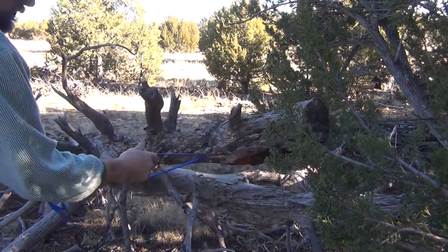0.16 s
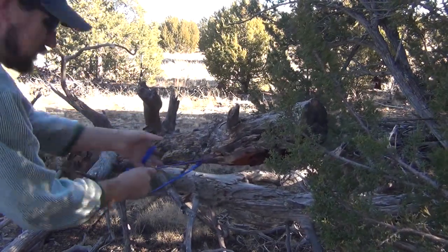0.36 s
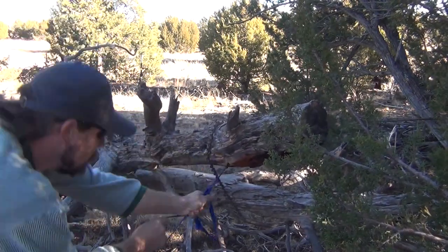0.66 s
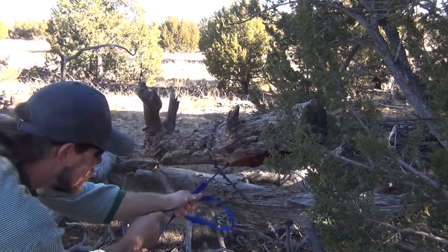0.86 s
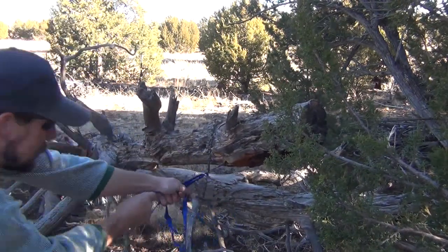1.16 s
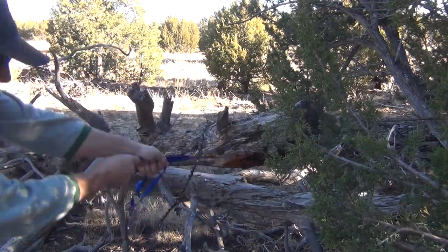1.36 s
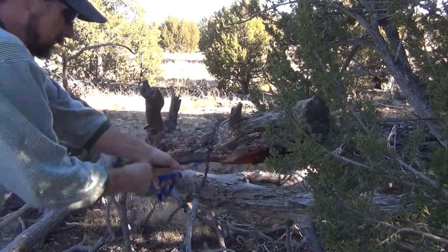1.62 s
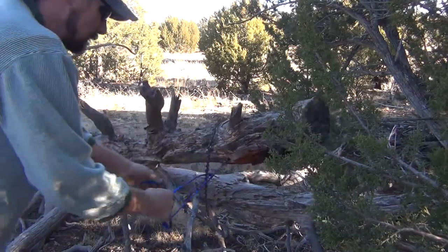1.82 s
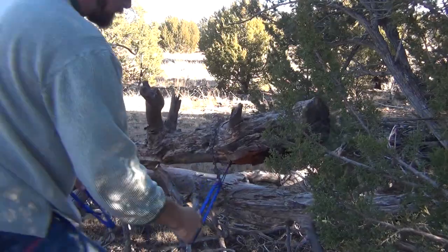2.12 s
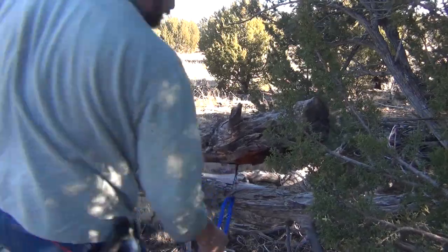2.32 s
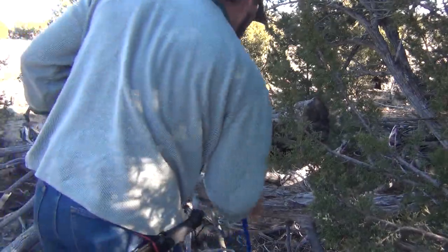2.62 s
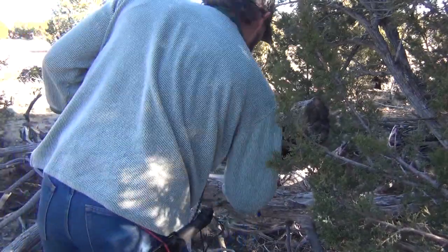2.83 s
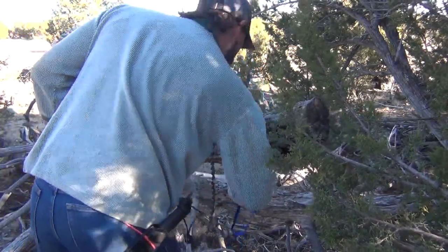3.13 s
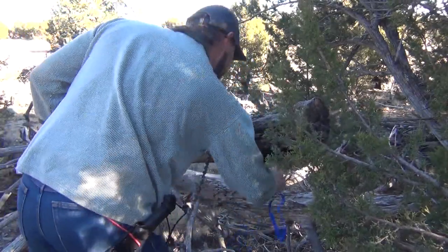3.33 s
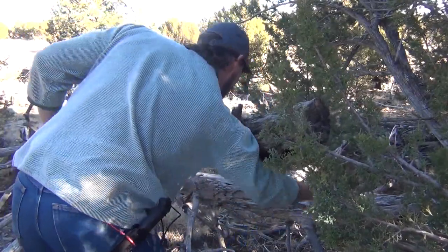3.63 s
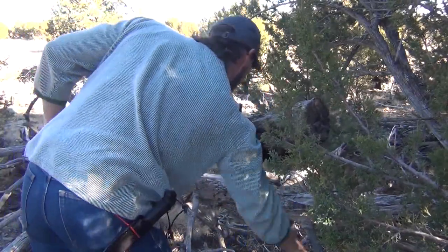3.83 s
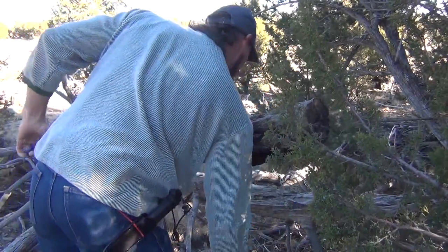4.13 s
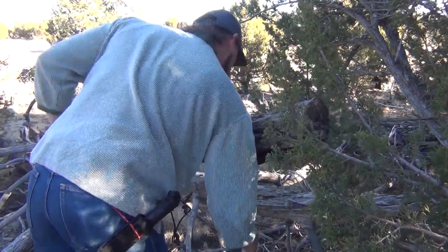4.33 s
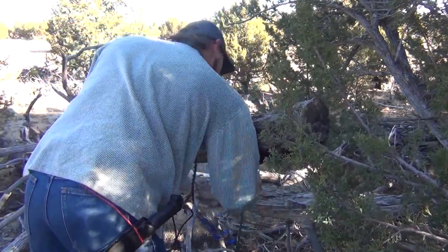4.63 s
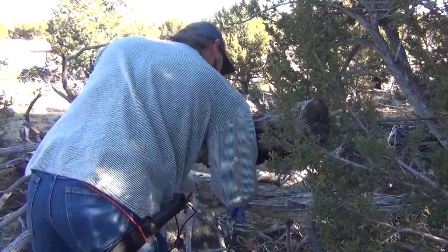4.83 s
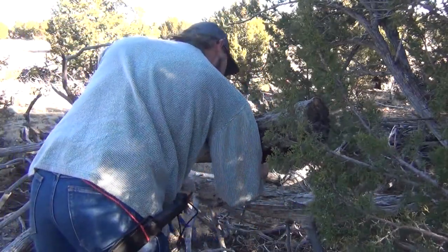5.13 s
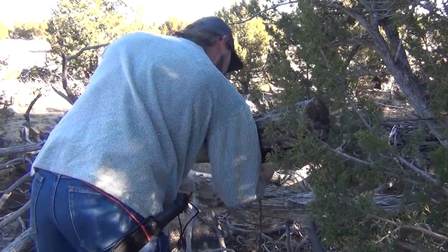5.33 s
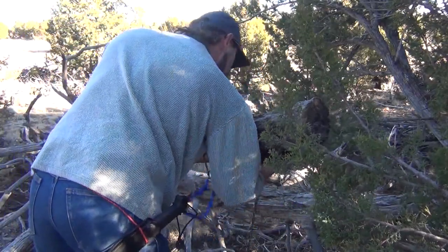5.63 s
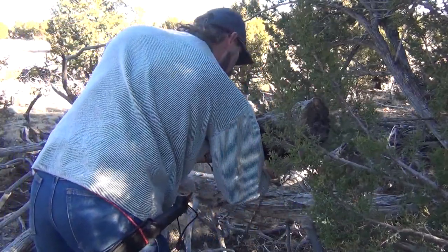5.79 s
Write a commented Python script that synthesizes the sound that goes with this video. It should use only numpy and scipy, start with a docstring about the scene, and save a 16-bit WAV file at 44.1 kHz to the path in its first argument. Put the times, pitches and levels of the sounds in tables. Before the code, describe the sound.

Outdoors, close and dry, a hand saw chain is dragged over a dead log. From 0 to 0.7 s coarse bright rasping dominates, full of sharp crackling snaps and dry woody knocks, strongest in the first 0.4 s. It eases, then two hard, resonant knocks land at about 1.3 and 1.4 s, followed by scraping and snaps until 1.75 s. Two tiny gliding metallic squeaks come near 1.9 s. Brittle crackling clusters at 2.3-2.5 s, then steel links clink and snap around 3.0-3.15 s. A woody scrape with a knock runs 3.5-3.7 s, and a hollow branch taps at 3.93 s. After 4.1 s it is sparse: a bright clink at 4.56, a snap at 4.76, very faint ticks near 5.0, 5.7 and 5.9 s. Low wind buffets flutter on the microphone, mostly before 2 s and at 3.7-4.4 s, over faint open-air hush and a thin, very high steady tone.

```python
"""Saw chain on a dry log

Outdoors among dead branches, a hand saw chain is dragged over a dry log and worked round it.
Teeth and links scrape the bark: tiny bursts of noise ring the wood and give a bright rasp. Twigs and bark snap
as short noise bursts; blows ring wood, a hollow branch and steel links; the links squeak as gliding whistles.
Gusts rumble on the microphone ports as low noise and swings, over a faint open-air hush and a thin high tone."""
import sys
import numpy as np
from scipy import signal
from scipy.fft import rfft, irfft, next_fast_len
from scipy.io import wavfile

SR = 44100
rng = np.random.default_rng(int(sys.argv[2]) if len(sys.argv) > 2 else 0)


def master(y):
    """Save y as 16-bit WAV."""
    cut = np.clip(np.atleast_2d(y).T, -1, 1)
    pcm = np.round(cut * 32767)  # scale
    wavfile.write(sys.argv[1], SR, pcm.astype(np.int16))


N = 262836
TIME = np.arange(N) / SR   # seconds
LEFT_RIGHT = np.array([[1], [-1]])   # opposite signs for the two channels

# what the dead wood rings with when undamped: [f/Hz, level/dB, time to fall 60 dB/s]
WOOD = [(163.4, 1, 0.15), (272.4, -1, 0.078), (421, -3, 0.069), (565, -1, 0.047), (777, -4, 0.056),
        (886, -8, 0.079), (1103, -2, 0.0064), (1466, 0.5, 0.051), (1910, -2, 0.01), (2210, 3.5, 0.011),
        (2486, -3.5, 0.025), (2850, 4, 0.0061), (3430, -5.5, 0.011), (4230, -24, 0.034), (5040, -29, 0.015)]


def from_db(db):
    """Turn decibels into gain."""
    return 10 ** (np.asarray(db) / 20)


def rms_one(x):
    """Scale to an rms (average strength) of 1."""
    return x / np.sqrt(np.mean(x ** 2) + 1e-20)


def in_time(rows):
    """Draw straight lines between table rows: one curve a column, one value a sample."""
    s, *columns = np.transpose(rows)
    return [np.interp(TIME, s, column) for column in columns]


def at_hz(points, hz):
    """Read a table over frequency, with straight lines on a log-frequency axis."""
    table_hz, values = np.array(points).T
    return np.interp(np.log(hz), np.log(table_hz), values)


def fft_grid():
    """Give a fast transform size and the frequency of each of its bins."""
    size = next_fast_len(N)
    return size, np.maximum(np.arange(size // 2 + 1) * SR / size, 1)


def colour(x, spectrum):
    """Filter a signal by a table of levels over frequency, then scale to rms 1."""
    size, hz = fft_grid()
    shaped = irfft(rfft(x, size) * from_db(at_hz(spectrum, hz)), size)
    return rms_one(shaped[..., :N])


def drift(rate_hz):
    """Wander slowly by chance: noise through two equal low-passes, rms 1."""
    r = np.exp(-2 * np.pi * rate_hz / SR)
    noise = rng.standard_normal(N + SR)
    slow = signal.lfilter([1], [1, -2 * r, r * r], noise)
    return rms_one(slow[SR:])   # the first second lets the filter settle


def resonance(x, hz, width_hz):
    """Ring at one frequency: a two-pole band-pass with gain about 1 at its top."""
    r = np.exp(-np.pi * width_hz / SR)
    top = (1 - r * r) / 2
    angle = 2 * np.pi * min(hz, 0.45 * SR) / SR
    return signal.lfilter([top, 0, -top], [1, -2 * r * np.cos(angle), r * r], x)


def highpass(x, hz):
    """Take away the lows with a gentle two-pole filter."""
    return signal.lfilter(*signal.butter(N=2, Wn=hz, btype="high", fs=SR), x)


def add(out, sound, s):
    """Mix a short sound in at time s."""
    i = round(s * SR)
    out[..., i:i + sound.shape[-1]] += sound[..., :N - i]


def at_random(per_s):
    """Pick chance moments, each with two normal draws."""
    draws = rng.standard_normal((600, 2))
    times = np.cumsum(rng.exponential(1, 600)) / per_s
    return [(s, *row) for s, row in zip(times, draws) if s < N / SR - 0.03]


def swell(t, contact_s):
    """Shape the force of a contact, which rises and then fades."""
    phase = t / max(0.5 * contact_s, 1e-4)
    return phase * np.exp(-phase)


def strike(push, modes, centre_hz, falloff_db):
    """Let a push ring every mode, less so far from the centre (dB per octave squared); peak 1."""
    ring = 0.45 * resonance(push, centre_hz, 1.73 * centre_hz)
    for k, (hz, level_db, t60) in enumerate(modes):
        width_hz = np.log(1000) / (np.pi * t60)   # a longer ring is narrower
        far_db = -falloff_db * np.log2(hz / centre_hz) ** 2
        gain = (-1) ** k * from_db(level_db + far_db) * np.sqrt(300 / width_hz)
        ring = ring + gain * resonance(push, hz, width_hz)
    return ring / np.abs(ring).max()


def hush():
    """Open air is steady noise, with a likeness of the two channels that changes with frequency."""
    # tone of the open air: [f/Hz, level per Hz/dB]
    air_tone = [(18, -44), (45, -7), (138, -12.5), (303, -1.5), (449, 0.5), (780, -2.5), (866, 2),
                (988, -3), (1190, -8), (16000, -13)]
    # likeness of left and right: [f/Hz, likeness from 0 to 1]
    likeness = [(60, 0.99), (240, 0.71), (950, 0.14), (3770, 0.22), (15000, 0.95)]
    hush_db = -60
    mid, side = rng.standard_normal((2, N))
    side_db = [(hz, 10 * np.log10(np.clip((1 - alike) / (1 + alike), 1e-3, 1))) for hz, alike in likeness]
    size, hz = fft_grid()
    side = irfft(rfft(side, size) * from_db(at_hz(side_db, hz)), size)[:N]
    return from_db(hush_db) * colour(mid + side * LEFT_RIGHT, air_tone)


def whine():
    """A thin, steady, very high tone is one sine, the same in both channels."""
    whine_hz, whine_db = 15735, -78   # rms level ahead of the microphone's roll-off
    return np.sqrt(2) * from_db(whine_db) * np.sin(2 * np.pi * whine_hz * TIME)


def wind():
    """Gusts on the ports are lumpy low noise, partly each port's own, with short swings on top."""
    # wind strength: [t/s, level/dB]
    wind_level = [(0.0, -55), (0.3, -50.5), (0.35, -62), (0.75, -56.5), (1.05, -55.5), (1.2, -65.5),
                  (1.4, -50), (1.7, -70.5), (2.1, -61.5), (2.9, -75), (3.45, -79), (3.7, -55.5),
                  (3.97, -52), (4.04, -73), (4.1, -52), (4.36, -58.5), (4.52, -78), (5.24, -74),
                  (5.63, -96), (5.96, -74)]
    # tone of the wind noise: [f/Hz, level per Hz/dB]
    gust_tone = [(25, -0.5), (70, 4), (130, -7.5), (220, -3), (400, -22)]
    # strong buffets, an eddy swinging the capsules a few times: [t/s, peak of the swing/dB, f/Hz]
    buffets = [(0.082, -34, 80.4), (0.127, -35.5, 98), (0.523, -34, 101), (0.751, -43, 99),
               (0.847, -42.5, 149), (0.999, -37, 104), (1.071, -34, 112), (1.098, -37.5, 127),
               (1.452, -38, 127), (1.845, -43.5, 111), (3.775, -39, 87.5), (3.822, -34, 150),
               (3.96, -42, 138), (4.085, -45, 110), (4.125, -38, 122), (4.275, -38.5, 120),
               (4.299, -31, 162)]
    # weaker eddies come at random, their typical level following the wind
    eddies_per_s, eddy_over_wind_db, eddy_hz = 30.0, 5, 102.5
    mid, side = rng.standard_normal((2, N))
    lumps = from_db(1.3 * drift(3.9))
    wind_db, = in_time(wind_level)
    out = from_db(wind_db) * colour(lumps * (mid + 0.12 * side * LEFT_RIGHT), gust_tone)

    eddies = []
    for s, p, q in at_random(eddies_per_s):
        db = wind_db[int(s * SR)] + eddy_over_wind_db + 5.0 * p
        eddies.append((s, db, eddy_hz * 1.25 ** q))
    swings = buffets + eddies
    angles = rng.uniform(-np.pi, np.pi, (len(swings), 2))
    for (s, db, hz), (start, skew) in zip(swings, angles):
        near = slice(max(round((s - 0.06) * SR), 0), min(round((s + 0.06) * SR), N))
        cycles = (TIME[near] - s) * hz
        slowing = 1 - 0.048 * cycles   # the pitch falls a little
        phase = 2 * np.pi * cycles * slowing + start + 0.2 * skew * LEFT_RIGHT
        out[:, near] += from_db(db) * np.exp(-(cycles / 0.74) ** 2) * np.sin(phase)
    return out


def squeaks():
    """Links squeak as short unsteady whistles gliding in pitch."""
    # squeaks: [t/s, length/s, start f/Hz, end f/Hz, typical peak level/dB]
    whistles = [(1.883, 0.025, 11800, 8800, -44), (1.945, 0.039, 12200, 14000, -44)]
    out = np.zeros(N)
    for s, length_s, from_hz, to_hz, db in whistles:
        t = np.arange(round(length_s * SR)) / SR
        hz = from_hz + (to_hz - from_hz) * t / length_s + 200 * drift(150)[:len(t)]
        gain = from_db(db + 2.5 * drift(120)[:len(t)]) * np.sin(np.pi * t / length_s)
        add(out, gain * np.sin(2 * np.pi * np.cumsum(hz) / SR), s)
    return out


def clinks():
    """Steel links clink together: a rough contact without lows rings the steel."""
    # clinks: [t/s, peak level/dB, centre of the ring f/Hz, contact length/s]
    touches = [(3.013, -24.5, 5000, 0.0053), (3.025, -17, 5000, 0.0024), (3.03, -19, 6500, 0.0011),
               (3.042, -26, 4500, .005), (3.063, -33, 5000, .002), (4.5627, -15, 11500, 0.0016),
               (5.911, -35, 8000, 0.0017), (5.929, -49, 10100, .002), (5.945, -47, 10500, .004)]
    # what the links ring with: [f/Hz, level/dB, time to fall 60 dB/s]
    steel = [(4340, -2, .02), (5150, -1.5, .02), (6100, -3, 0.017), (7200, -4, 0.013), (8140, -2, .015),
             (10300, 1, .02), (11700, 9, 0.021)]
    out, t = np.zeros(N), np.arange(6000) / SR
    for s, db, centre_hz, contact_s in touches:
        push = highpass(rng.standard_normal(len(t)) * swell(t, contact_s), 3500)
        add(out, from_db(db) * strike(push, steel, centre_hz, falloff_db=12.0), s)
    return out


def hollow_tap():
    """One tap on a hollow dry branch: a sharp pulse with some roughness rings the branch."""
    # the tap: [t/s, peak level/dB]
    tap = (3.9335, -11.5)
    # what the branch rings with: [f/Hz, level/dB, time to fall 60 dB/s]
    branch = [(608, -5.5, 0.032), (880, -2, 0.11), (1070, -1, 0.035), (1910, 5.5, 0.017), (2260, 10, 0.035),
              (2790, -13, 0.044), (3450, -5, 0.029), (4110, -13, .02)]
    out, t = np.zeros(N), np.arange(6000) / SR
    pulse = np.exp(-((t - 0.0015) / 0.00006) ** 2)
    rough = 0.15 * rng.standard_normal(len(t)) * swell(t, 0.0027)
    tap_s, tap_db = tap
    add(out, from_db(tap_db) * strike(pulse + rough, branch, 1130, falloff_db=1.5), tap_s)
    return out


def knocks():
    """Blows on dead wood: a rough contact, swelling then fading, rings the wood and shakes the log."""
    # blows: [t/s, peak level of the ring/dB, centre of the ring f/Hz, contact length/s]
    blows = [(0.057, -16.5, 2610, 0.0085), (0.282, -13, 3520, 0.0048), (0.357, -23, 1370, 0.00098),
             (0.6, -31, 1290, 0.0015), (0.609, -18.5, 3740, 0.0084), (1.186, -34, 590, 0.0047),
             (1.298, -7, 1660, 0.0065), (1.423, -7.5, 620, 0.0048), (1.501, -38, 565, 0.0073),
             (1.557, -20.5, 2030, 0.0034), (1.727, -30.5, 1780, 0.0034), (2.256, -41.5, 450, 0.0048),
             (2.477, -35.5, 636, 0.002), (2.515, -32, 570, 0.0022), (2.613, -37.5, 1950, 0.0021),
             (2.688, -47, 676, 0.0048), (2.926, -36, 1164, 0.0016), (2.963, -37.5, 2400, 0.0052),
             (3.013, -36, 394, 0.01), (3.049, -34.5, 400, 0.0034), (3.474, -23, 1600, 0.0065),
             (3.4905, -11, 2870, 0.0013), (3.698, -24, 1090, 0.005), (4.556, -30, 1746, 0.0028),
             (4.996, -47, 1170, 0.005), (5.01, -53, 1580, 0.008), (5.036, -49, 1600, 0.0036),
             (5.039, -44, 1130, 0.0025), (5.057, -46.5, 1240, 0.0055), (5.548, -41, 1090, 0.003),
             (5.5485, -39, 1640, 0.0035), (5.905, -41.5, 1800, 0.0034), (5.927, -47, 1700, 0.0043),
             (5.942, -47, 635, .01)]
    # weaker blows are soft touches on small pieces: dull, damped, ringing at their own pitch
    soft_db, soft_range_db = -34, 3.5
    thud_hz, thud_db = 222, -22.5   # every blow shakes the whole log; gain relative to the blow
    out, t = np.zeros(N), np.arange(6000) / SR
    thud_shape = (1 - np.exp(-t / 0.0066)) * np.exp(-t / 0.011)
    thud = from_db(thud_db) * thud_shape * np.sin(2 * np.pi * thud_hz * t)
    for s, db, centre_hz, contact_s in blows:
        soft = 1 / (2.5 + np.exp((db - soft_db) / soft_range_db))   # from 0 (hard) to 0.4
        push = rng.standard_normal(len(t)) * swell(t, contact_s)
        own_pitch = resonance(push, centre_hz, 0.46 * centre_hz)
        push = (1 - soft) ** 2 * push + 3.3 * soft * own_pitch
        damping = max(1 - 0.9 * soft, 0.1)
        modes = [(hz, level_db, t60 * damping) for hz, level_db, t60 in WOOD]
        modes.append((centre_hz, 20 * soft - 8, 0.03))
        add(out, from_db(db) * (strike(push, modes, centre_hz, falloff_db=7.5) + thud), s)
    return out


def snaps(rasp_gain):
    """A crack of noise builds in a fraction of a ms and dies in a few, with a duller woody tick."""
    # twigs, bark and links snapping: [t/s, crack peak/dB, crack colour f/Hz, woody tick re crack/dB]
    breaks = [(0.034, -11, 6530, -23), (0.0402, -17, 11000, -20), (0.0502, -13, 7560, -11),
              (0.0614, -12, 7050, -21), (0.0955, -17, 7000, -15), (0.14, -13.5, 8500, -1),
              (0.1535, -11, 7460, -16), (0.1622, -2, 7450, -16), (0.1718, -6, 8740, -14),
              (0.1797, -10, 8200, -7), (0.2156, -18, 7500, -15), (0.2443, -18, 10300, -12),
              (0.2776, -10, 10300, -10.5), (0.2845, -10.5, 8200, -8), (0.328, -11, 10700, -6.5),
              (0.347, -6.5, 7050, -6.5), (0.3886, -17.5, 8400, -4.5), (0.4891, -8.5, 8300, -9.5),
              (0.5557, -14.5, 7100, -17), (0.5751, -8.5, 8200, -7), (0.5941, -13, 8200, 0.5),
              (0.6705, -12, 7500, -14), (0.7241, -27.5, 8800, 2), (0.7414, -23, 7100, -3.5),
              (0.7783, -17, 8100, -13), (0.803, -23, 6000, -10), (0.865, -10.5, 8500, -14.5),
              (0.8945, -16.5, 9200, -16), (1.1129, -26.5, 7900, -6.5), (1.2273, -22.5, 7160, -13),
              (1.3012, -4.5, 11500, -9.5), (1.3598, -14.5, 8400, -16), (1.426, -13, 5900, 4),
              (1.461, -10.5, 8900, -28), (1.4645, -17.5, 5900, -3), (1.5285, -12, 10500, -9),
              (1.5582, -7, 7700, -20), (1.7028, -23.5, 7310, -0.5), (1.7326, -20, 11500, -28),
              (2.0358, -28.5, 6840, -18), (2.2963, -9.5, 8300, -18), (2.3307, -9, 10300, -12),
              (2.369, -8.5, 10700, -34), (2.3927, -10, 10200, -31), (2.4143, -9.5, 7500, -8.5),
              (2.4321, -5.5, 9500, -31), (2.4649, -4.5, 11600, -40), (2.488, -10, 11300, -15.5),
              (2.5505, -22, 9300, 2), (2.5653, -16.5, 8540, -33), (2.9757, -13.5, 10700, -14.5),
              (3.0257, -6.5, 12200, -32), (3.0442, -22, 11000, -11), (3.0532, -18, 11500, -10),
              (3.0705, -21, 9000, -13), (3.0838, -3, 11300, -26), (3.1265, -5, 7900, -17.5),
              (3.1371, -13.5, 8200, -12.5), (3.1778, -23.5, 8360, -8), (3.491, -15.5, 5430, 2),
              (3.513, -20, 7750, -4), (3.5403, -14.5, 9150, -0.5), (3.55, -17, 7000, 1),
              (3.5764, -20, 10300, -7.5), (3.59, -4, 11200, -20), (3.5952, -11, 10200, -24),
              (3.609, -10, 11000, -37), (3.771, -22.5, 8500, -10), (3.8103, -15.5, 11200, -18),
              (3.8608, -24, 9200, -21), (3.8683, -19.5, 11300, -8.5), (3.9094, -22.5, 10700, -9.5),
              (4.0773, -22, 12000, -18.5), (4.1505, -29.5, 12200, -9.5), (4.5635, -15, 12100, -18.5),
              (4.7574, -21, 10700, -20), (5.7106, -31, 11600, -25.5), (5.899, -42, 10500, -20)]
    small_per_s, small_over_rasp_db = 30.0, 12   # the faint crackle follows the rasp
    out, t = np.zeros((2, N)), np.arange(900) / SR
    small = []
    for s, p, q in at_random(small_per_s):
        rasp_db = 20 * np.log10(rasp_gain[int(s * SR)])
        small.append((s, rasp_db + small_over_rasp_db + 2.7 * p, 8500 * 1.38 ** q, -9))
    for s, db, hz, wood_db in breaks + small:
        a, b = rng.standard_normal((2, len(t)))
        fade = np.exp(-t / 0.00033) + 0.038 * np.exp(-t / 0.0045)
        burst = a * (1 - np.exp(-t / 0.00039)) * fade
        crack = resonance(burst, hz, 2000) + 0.26 * np.diff(burst, prepend=0)
        crack = highpass(crack, 3200)   # thin pieces radiate no lows
        tick = resonance(b * (1 - np.exp(-t / 0.0002)) * np.exp(-t / 0.0015), 760, 2320)
        snap = crack / np.abs(crack).max() + from_db(wood_db) * tick / np.abs(tick).max()
        snap = from_db(db) * snap
        # each arrives a little earlier and louder at one port
        turn = rng.standard_normal()
        add(out, snap + turn * (0.24 * np.gradient(snap) + 0.06 * snap) * LEFT_RIGHT, s)
    return out


def effort():
    """Each drag bites, holds and fades over the rustle; gives scrape gain, its pitch and rasp gain."""
    # rustle of chain and hands on the bark between drags: [t/s, woody scrape level/dB, rasp level/dB]
    rustle = [(0.0, -38.5, -25), (0.16, -56, -50), (0.33, -53, -46.5), (0.73, -50.5, -40), (0.9, -58, -48),
              (1.03, -63, -60), (1.14, -55, -51), (1.53, -43.5, -41.5), (1.78, -51.5, -50.5),
              (2.24, -56.5, -53), (2.44, -47.5, -40.5), (2.62, -58, -54.5), (2.94, -63.5, -59),
              (3.1, -53.5, -49.5), (3.42, -55.5, -58.5), (3.67, -45, -45), (4.1, -61, -62.5),
              (5.39, -69, -65), (5.96, -63.5, -69)]
    # single drags: [t/s, length/s, woody scrape level/dB, pitch centre f/Hz, rasp level/dB]
    drags = [(0.0, 0.099, -36.5, 2350, -34), (0.134, 0.12, -36, 1520, -33), (0.27, 0.034, -35.5, 2000, -30),
             (0.495, 0.029, -39.5, 1750, -40), (0.59, 0.045, -39.5, 1800, -34),
             (0.653, 0.029, -46, 2420, -31.5), (1.203, 0.092, -66, 1500, -46),
             (1.295, 0.034, -32.5, 1390, -49), (1.418, 0.092, -36.5, 1610, -54),
             (1.587, 0.16, -44, 1880, -41), (2.252, 0.039, -49.5, 1900, -46.5),
             (2.31, 0.086, -42, 1380, -39), (2.917, 0.089, -49.5, 2000, -51),
             (3.007, 0.1, -48.5, 1950, -49), (3.157, 0.0084, -33, 1620, -45),
             (3.234, 0.011, -40, 1450, -47.5), (3.366, 0.032, -41, 1400, -58),
             (3.478, 0.049, -31, 1640, -37.5), (3.53, 0.06, -31, 1140, -34),
             (3.604, 0.068, -41.5, 590, -43), (3.699, 0.03, -37.5, 1040, -42.5),
             (3.781, 0.042, -42.5, 1490, -40.5), (4.014, 0.04, -61, 1310, -52.5),
             (4.554, 0.012, -44, 1300, -39), (4.754, 0.016, -45.5, 1440, -48),
             (4.982, 0.056, -52.5, 1600, -62), (5.253, 0.016, -76, 1120, -59),
             (5.383, 0.063, -80, 1260, -59.5), (5.717, 0.023, -76, 1200, -61),
             (5.898, 0.07, -56, 1000, -60)]
    rustle_hz = 1420   # pitch centre of the rustle
    rise_s, fall_s = 0.01, 0.011   # time to bite; time constant of the fade
    wood_db, rasp_db = in_time(rustle)
    wood_power, rasp_power = from_db(2 * wood_db), from_db(2 * rasp_db)
    pitch_sum = wood_power * np.log(rustle_hz)   # the stronger sound pulls the pitch more
    for s, length_s, drag_db, hz, bright_db in drags:
        bite = np.clip((TIME - s) / rise_s, 0, 1)
        fade = np.exp(-np.maximum(TIME - s - length_s, 0) / fall_s)
        shape = (bite * fade) ** 2
        drag_power = from_db(2 * drag_db) * shape
        wood_power = wood_power + drag_power
        rasp_power = rasp_power + from_db(2 * bright_db) * shape
        pitch_sum = pitch_sum + drag_power * np.log(hz)
    return np.sqrt(wood_power), np.exp(pitch_sum / wood_power), np.sqrt(rasp_power)


def grains(per_s, spread_db, grain_s, clump_db):
    """Tiny fibres break at random, in clumps, each a short puff of noise."""
    born = rng.random(N) < per_s * from_db(clump_db * drift(25)) / SR
    sizes = born * from_db(spread_db * np.minimum(rng.exponential(1, N), 4))
    puffs = signal.lfilter([1], [1, -np.exp(-1 / (grain_s * SR))], sizes + 1e-18)
    return puffs * rng.standard_normal(N)


def tooth_catches():
    """Steel teeth catch on the bark: grains in six bands, each band coming and going."""
    catches = 0
    for hz in (3490, 5200, 6500, 8650, 11000, 14100):
        bursts = grains(per_s=350.0, spread_db=1.0, grain_s=0.0013, clump_db=4.0)
        catches = catches + resonance(bursts, hz, 0.46 * hz) * from_db(2.14 * drift(24.0))
    return catches


def scrape(wood_gain, wood_hz, rasp_gain):
    """Dragging rings the wood's modes, damped by the contact, and the catching teeth rasp high up."""
    # tone of the bright rasp: [f/Hz, level per Hz/dB]
    rasp_tone = [(2650, 1.5), (4500, -10), (6220, -1.5), (7180, -4), (11900, 0), (16000, -9.5)]
    rasp_width = 0.12   # share of the rasp that differs between the ports
    drag = grains(per_s=830.0, spread_db=4.0, grain_s=0.0049, clump_db=1.5)
    catches = tooth_catches()
    wood, power = 0, 0
    for k, (hz, *_) in enumerate(WOOD):
        # modes near the scraped piece's pitch lead, each coming and going
        slope_db = np.where(hz > wood_hz, 2.5, 0.8)
        share = from_db(-slope_db * np.log2(hz / wood_hz) ** 2 + 2.4 * drift(30.0))
        ring = resonance(resonance(drag, hz, 0.16 * hz), hz, 1.38 * hz)
        wood = wood + (-1) ** k * share * rms_one(ring)
        power = power + share ** 2
    rasp = colour(catches + rasp_width * np.roll(catches, 37) * LEFT_RIGHT, rasp_tone)
    return wood_gain * wood / np.sqrt(power) + rasp_gain * rasp


def ports(x):
    """Two close ports hear the same source, shifted in phase and slightly louder on the left."""
    # phase between the ports: [f/Hz, lead of the left/radians]
    port_phase = [(0, 0), (6030, 0.14), (8700, 0.61), (14000, 0.57), (16500, 0.49)]
    size, hz = fft_grid()
    half_lead = at_hz(port_phase, hz) / 2
    shifted = irfft(rfft(x, size) * np.exp(1j * half_lead * LEFT_RIGHT), size)[:, :N]
    return shifted * from_db(0.2 * LEFT_RIGHT)


def clearing(x):
    """A nearby trunk gives an early echo: its treble lags differently on each side, its bass alike."""
    # echo: [left delay/s, right delay/s, level/dB]
    echoes = [(.0058, 0.0025, -17.5)]
    low = signal.sosfilt(signal.butter(1, 3000, fs=SR, output="sos"), x)
    out = x.copy()
    for left_s, right_s, db in echoes:
        bass_lag = round(left_s * SR)
        for side, lag_s in enumerate((left_s, right_s)):
            lag = round(lag_s * SR)
            out[side, lag:] += from_db(db) * (x - low)[side, :-lag]
            out[side, bass_lag:] += from_db(db) * low[side, :-bass_lag]
    return out


def scene():
    """Work on the log in the clearing, with wind, hush and the high tone."""
    wood, wood_hz, rasp = effort()
    blows = knocks() + clinks() + hollow_tap()
    work = scrape(wood, wood_hz, rasp) + snaps(rasp) + blows + squeaks()
    return clearing(ports(work)) + wind() + hush() + whine()


def record(dry):
    """The microphone rolls off at the very top, then a steep cut removes what lies above."""
    soft = signal.sosfilt(signal.butter(10, 15900, fs=SR, output="sos"), dry)
    # at least 70 dB down from 17000 Hz upward
    return signal.sosfilt(signal.cheby2(12, 70, 17000, fs=SR, output="sos"), soft)


dry = scene()
out = record(dry)
master(out)
```